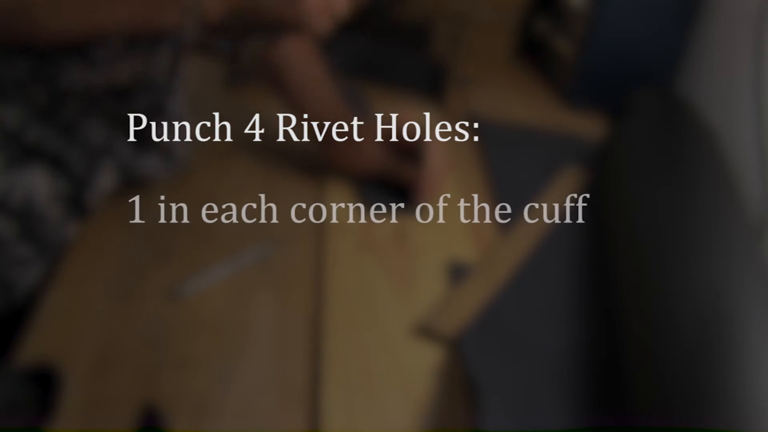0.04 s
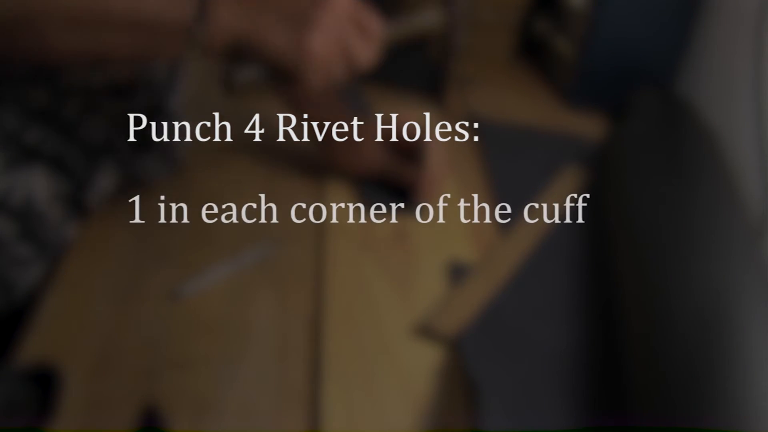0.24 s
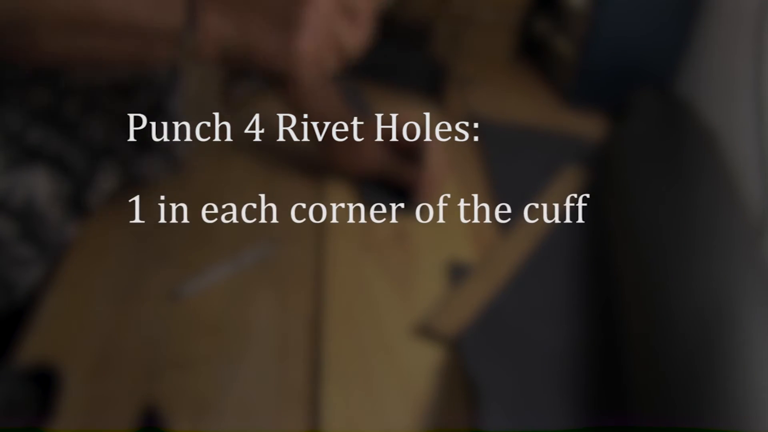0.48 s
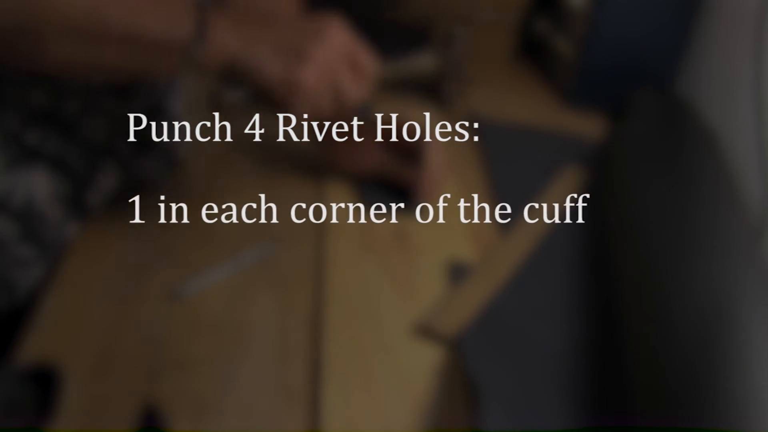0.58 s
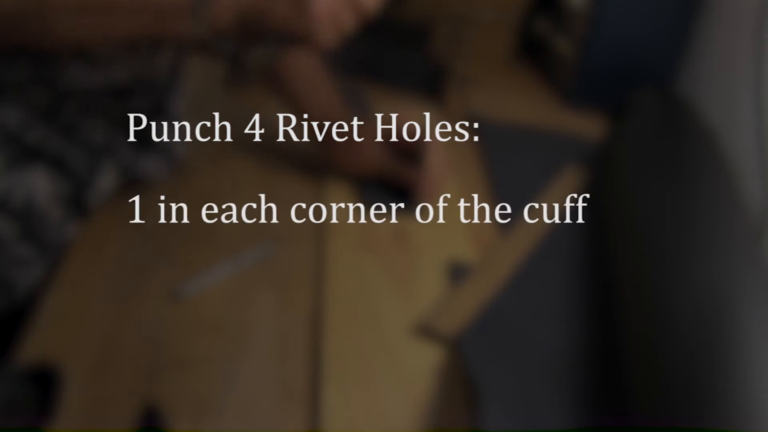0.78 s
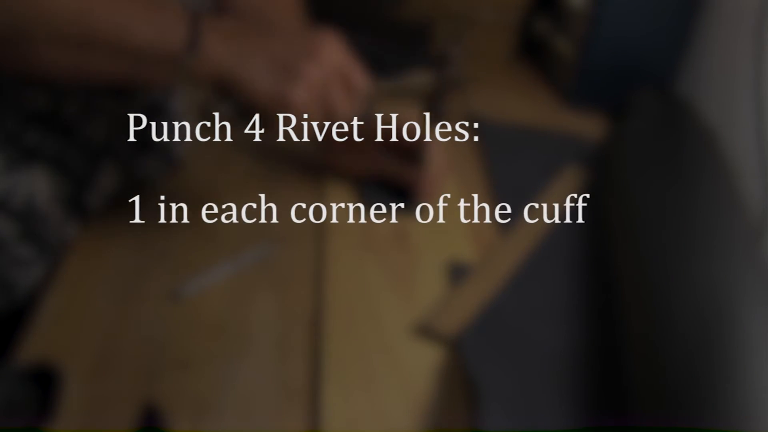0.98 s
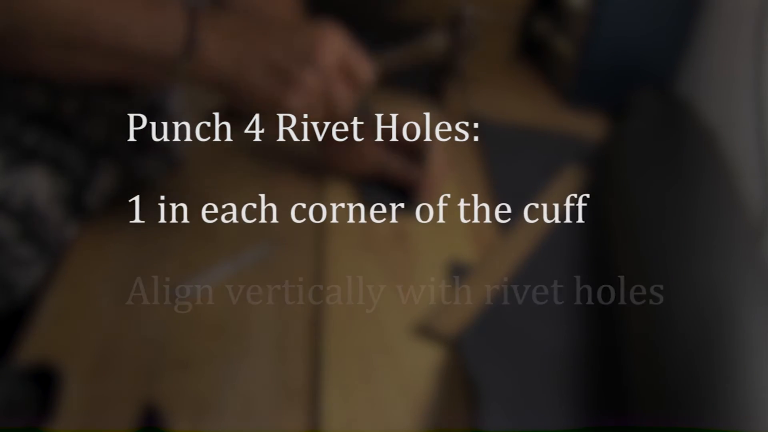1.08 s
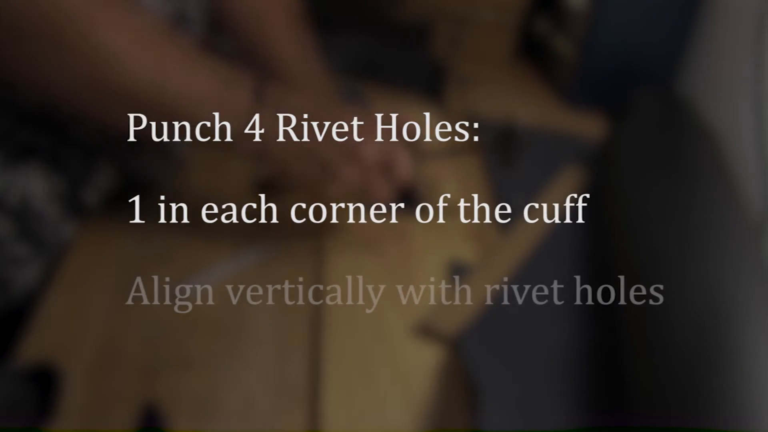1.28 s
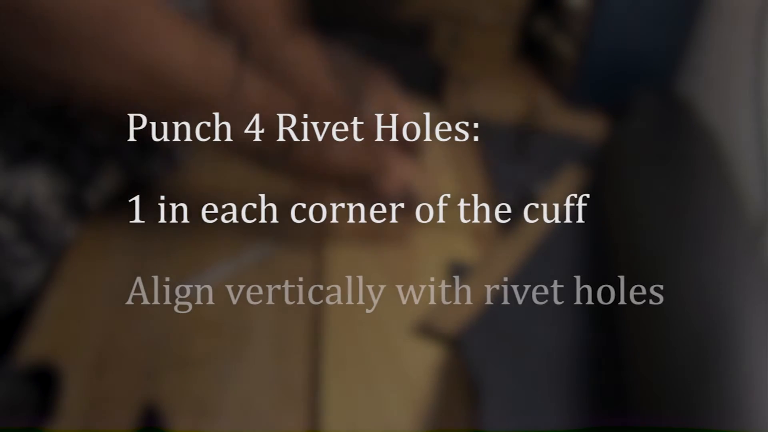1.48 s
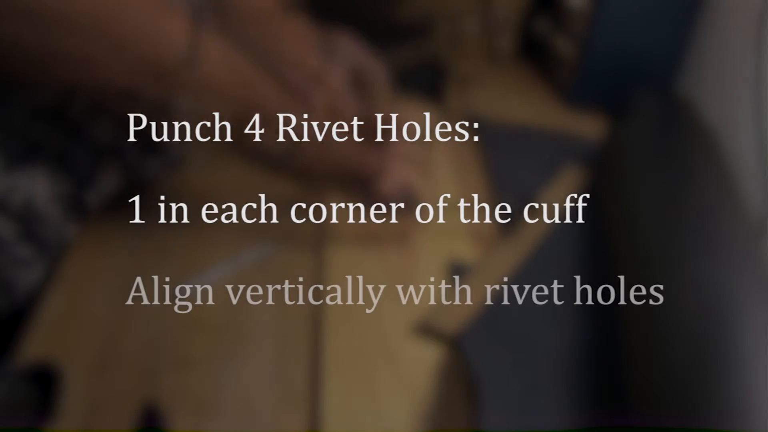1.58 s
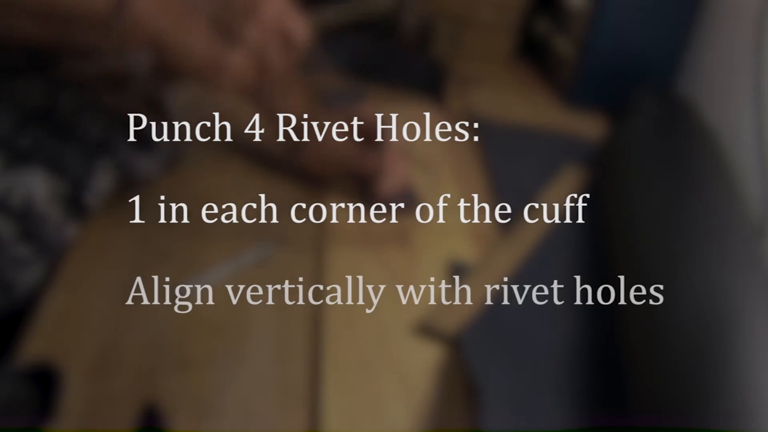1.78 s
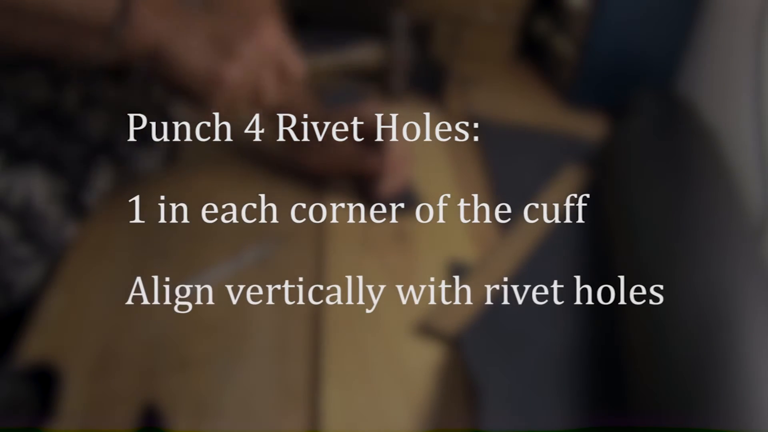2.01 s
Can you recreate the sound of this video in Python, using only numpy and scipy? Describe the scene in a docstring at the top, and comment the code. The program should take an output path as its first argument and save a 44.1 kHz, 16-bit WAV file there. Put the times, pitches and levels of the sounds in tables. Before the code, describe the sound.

Three hard, evenly spaced hammer blows on a metal punch crack and thump against wood, with room echo swelling after each; the ringing stops abruptly and soft woody bumps follow over low rumble and faint hiss.

```python
"""The fading ring of a hammer blow comes first, then light hammer chatter and three more blows in an echoey workshop.
A hammer drives a steel hole punch through leather into a board: decaying sines make the wood and steel ring,
shaped noise makes the crack and the room. The recorder's limiter ducks each blow and lets the room swell back.
Soft knocks of things shifted on the bench follow; between them the ringing is cut short and leather slides briefly.
Low rumble and faint hiss run throughout."""
import sys
import numpy as np
from scipy import signal
from scipy.fft import rfft, irfft
from scipy.io import wavfile
from scipy.ndimage import uniform_filter1d, minimum_filter1d

SR = 44100
rng = np.random.default_rng(int(sys.argv[2]) if len(sys.argv) > 2 else 0)


def file_out(sig):
    """Save sig as 16-bit WAV at sys.argv[1]."""
    # one column per channel
    cols = np.atleast_2d(sig).T
    # limit, then scale
    lim = np.clip(cols, -1, 1)
    pcm = np.round(lim * 32767).astype(np.int16)
    wavfile.write(sys.argv[1], SR, pcm)


N = 90404  # length in samples

LEAD_S = 0.25  # the track starts this early, so a blow before time zero can still ring
ALIKE_BELOW_HZ = 1500  # below this the room's echoes repeat from blow to blow


def amp(db):
    """Turns decibels into a gain."""
    return 10 ** (np.asarray(db) / 20)


def read(points, hz):
    """Reads a table of (pitch_hz, value) at any pitch, joining its points on a log-frequency axis."""
    pitch_hz, value = np.transpose(points)
    return np.interp(np.log(hz + 1), np.log(pitch_hz), value)


def add(mix, start_s, sound):
    """Adds a sound to a track that begins LEAD_S early, dropping what runs past the end."""
    start = max(round((start_s + LEAD_S) * SR), 0)
    part = mix[:, start:][:, :sound.shape[-1]]
    part += sound[..., :part.shape[1]]


def fade(t, t60_s):
    """Exponential decay that falls by 60 dB in t60_s."""
    return np.exp(-np.log(1000) * t / np.maximum(t60_s, 1e-3))


def noise(db_of, size, white=None, width=None):
    """Stereo noise with density db_of(hz), in dB per Hz; a quieter side signal gives it width."""
    # default stereo width: pitch_hz [Hz], side_over_mid_db [dB]
    usual_width = [(30, -26), (60, -41), (130, -56), (300, -51), (600, -25.5), (1400, -68), (3000, -43),
                   (5500, -21), (9000, -16), (14000, -13)]
    width = usual_width if width is None else width
    hz = np.fft.rfftfreq(size, 1 / SR)
    if white is None:
        white = rfft(rng.standard_normal((2, size)))
    mid, side = white * amp(db_of(hz)) * np.sqrt(SR / 2)
    side = side * amp(read(width, hz))
    return irfft([mid + side, mid - side], size)


def modes(table, t):
    """Natural vibrations of a struck body: decaying sines of alternating sign."""
    out = np.zeros(len(t))
    for k, (pitch_hz, level_db, t60_s) in enumerate(table):
        sine = np.sin(2 * np.pi * pitch_hz * t)
        out += (-1) ** k * amp(level_db) * fade(t, t60_s) * sine
    return out


def background():
    """Steady noise for room rumble and electronic hiss, plus a swell of noise for sliding leather."""
    # steady floor of rumble and hiss: pitch_hz [Hz], density_db [dB per Hz]
    floor_spectrum = [(20, -69), (35, -79), (57, -68), (95, -81.5), (150, -83.5), (220, -88), (285, -83),
                      (400, -90.5), (600, -92), (1200, -98), (2500, -99), (5500, -106), (9500, -110),
                      (13800, -117), (15000, -130)]
    # stereo width of the steady floor: pitch_hz [Hz], side_over_mid_db [dB]
    floor_width = [(60, -31), (130, -27), (290, -15), (640, -6.5), (1410, -15.5), (3100, -11.5),
                   (6820, -17), (15000, -7)]
    # leather rubbing on the board: pitch_hz [Hz], density_db [dB per Hz]
    slide_spectrum = [(300, -100), (1500, -100), (4500, -99), (11000, -106), (16000, -116)]
    hiss_hz, hiss_half_width_hz, hiss_db_per_hz = 7690, 475, -91.5
    slide_peak_s, slide_spread_s = 1.66, 0.048

    def hiss_db(hz):
        return hiss_db_per_hz - 10 * np.log10(1 + ((hz - hiss_hz) / hiss_half_width_hz) ** 4)

    t = np.arange(N) / SR
    floor = noise(lambda hz: read(floor_spectrum, hz), N, width=floor_width)
    hiss = noise(hiss_db, N, width=floor_width)
    swell = np.exp(-((t - slide_peak_s) / slide_spread_s) ** 2 / 2)
    slide = noise(lambda hz: read(slide_spectrum, hz), N) * swell
    return floor + hiss + slide


def knock(level_db, dull_above_hz, t60_s):
    """Work shifted on the bench: a soft, woody bump of fading noise with its treble rolled off."""
    # bump before the roll-off: pitch_hz [Hz], density_db [dB per Hz]
    knock_spectrum = [(60, -72), (200, -74), (420, -67), (650, -73), (950, -73.5), (1500, -81.5),
                      (3000, -83), (9000, -97)]
    rise_s = 0.00073

    def dulled_db(hz):
        return read(knock_spectrum, hz) - 10 * np.log10(1 + (hz / dull_above_hz) ** 6)

    t = np.arange(SR // 2) / SR
    body = noise(dulled_db, len(t))
    return amp(level_db) * body * (1 - np.exp(-t / rise_s)) * fade(t, t60_s)


def tick(level_db):
    """A light touch of the hammer on the punch: short modes and a puff of noise."""
    # small vibrations of the touch: pitch_hz [Hz], level_db [dB], t60_s [s]
    tick_modes = [(407, -36, 0.011), (710, -44, 0.031), (2580, -44, .05), (4230, -39, 0.027),
                  (4660, -44, 0.02), (8600, -46, 0.02), (13110, -60, .02)]
    # noise of the touch: pitch_hz [Hz], density_db [dB per Hz]
    tick_spectrum = [(200, -71), (1500, -90), (5000, -80), (14000, -100)]
    noise_t60_s = 0.031
    t = np.arange(SR // 4) / SR
    puff = noise(lambda hz: read(tick_spectrum, hz), len(t)) * fade(t, noise_t60_s)
    return amp(level_db) * (modes(tick_modes, t) + puff)


def room(colour, t, paths):
    """The workshop's answer: echo noise fading at each pitch's own rate, booming modes and a faint long ring."""
    # reverberation before the blow's colour: pitch_hz [Hz], density_db [dB per Hz]
    tail_spectrum = [(25, -64), (60, -40.5), (125, -36.5), (200, -40.5), (250, -38.5), (330, -35),
                     (450, -35), (700, -37), (1000, -38.5), (1700, -41), (2600, -41.5), (3400, -46),
                     (4400, -45), (7200, -45.5), (9000, -51), (10800, -51.5), (12500, -60), (16000, -72)]
    # how long the reverberation lasts: pitch_hz [Hz], t60_s [s]
    tail_t60 = [(50, 1), (130, 0.41), (300, 0.42), (1000, 0.35), (3000, 0.35), (7000, .39), (15000, 0.34)]
    # long low modes of the room: pitch_hz [Hz], level_db [dB], t60_s [s]
    boom_modes = [(58.2, -37, 1.5), (112.64, -19.5, 1.074), (150.4, -22.5, 1.05), (172, -20.5, 0.92),
                  (226, -33, 1.2), (277, -28.5, 0.91), (394, -23.5, 0.58)]
    # lingering ring of things around the bench: pitch_hz [Hz], density_db [dB per Hz]
    linger_spectrum = [(40, -55.5), (120, -47), (400, -66), (900, -74), (2000, -78), (3500, -93),
                       (8000, -105)]
    linger_t60_s, rise_s = 1.91, 0.0027
    colour_share = 0.74  # part of the blow's colour, in dB, that reaches the echoes

    # the same low echoes every time, fresh ones above
    low = np.fft.rfftfreq(len(t), 1 / SR) < ALIKE_BELOW_HZ
    white = np.where(low, paths, rfft(rng.standard_normal((2, len(t)))))
    steady = noise(lambda hz: read(tail_spectrum, hz) + colour_share * colour(hz), len(t), white)

    # fade each pitch at its own rate
    pitch_hz, when_s, grains = signal.stft(steady, SR, nperseg=512)
    faded = grains * fade(when_s, read(tail_t60, pitch_hz)[:, None])
    tail = signal.istft(faded, SR)[1][:, :len(t)]
    linger = noise(lambda hz: read(linger_spectrum, hz), len(t)) * fade(t, linger_t60_s)
    return (tail + linger + modes(boom_modes, t)) * (1 - np.exp(-t / rise_s))


def steel_colour(bands):
    """Each blow lands differently: stressed or missing bands and a fine random ripple of steel resonances."""
    ripple_db, ripple_step_hz = 1.6, 130
    grid_hz = np.arange(200) * ripple_step_hz
    ripple = ripple_db * rng.standard_normal(len(grid_hz)) * (grid_hz > ALIKE_BELOW_HZ)

    def colour(hz):
        total_db = np.interp(hz, grid_hz, ripple)
        for centre_hz, width_hz, level_db in bands:
            total_db = total_db + level_db * np.exp(-((hz - centre_hz) / width_hz) ** 2)
        return total_db

    return colour


def punch_ring(levels_db, t):
    """The steel punch's two high modes, brief themselves but held on by narrow bands of room echo."""
    # ring of the punch before each blow's levels: pitch_hz [Hz], level_db [dB], t60_s [s]
    punch_modes = [(11010, -1.5, 0.043), (11580, -7, 0.032)]
    echo_db, echo_t60_s, echo_width_hz = -14, 0.34, 160
    out = np.zeros((2, len(t)))
    for (pitch_hz, mode_db, t60_s), level_db in zip(punch_modes, levels_db):
        band = noise(lambda hz: -10 * np.log10(1 + (2 * (hz - pitch_hz) / echo_width_hz) ** 4), len(t))
        echo = amp(echo_db) * band / band.std() * fade(t, echo_t60_s)
        direct = modes([(pitch_hz, mode_db, t60_s)], t)
        out += amp(level_db) * (direct + echo)
    return out


def blow(t, paths, force_db, crack_db, seat_db, lower_ring_db, upper_ring_db, bands):
    """One hammer blow: the board thumps, the steel cracks and rings a moment later, the room answers."""
    # modes of the board and bench: pitch_hz [Hz], level_db [dB], t60_s [s]
    board_modes = [(103.3, -13.5, 0.32), (136.3, -3.5, 0.16), (200.2, -0.5, 0.12), (288.9, -0.5, 0.19),
                   (322.6, -4, .15), (358.2, -2.5, 0.17), (398.4, 1.5, 0.21), (429.4, -4.5, 0.23),
                   (498, -10, 0.23), (729.3, -6.5, .16), (890, -16, 0.32), (1057.5, -4.5, 0.095),
                   (1157, -5, 0.09), (1359, -5.5, .11), (2127, -14, 0.16), (2766, -17.5, 0.11)]
    # mode of the punch once seated in the wood: pitch_hz [Hz], level_db [dB], t60_s [s]
    seat_modes = [(603, -2, 0.23)]
    # crack of steel on steel before the blow's colour: pitch_hz [Hz], density_db [dB per Hz]
    crack_spectrum = [(60, -72), (400, -17.5), (1000, -23), (1750, -37), (2800, -27.5), (3500, -37),
                      (4800, -29.5), (7000, -35), (8800, -41.5), (10500, -34), (12500, -47.5), (16000, -38)]
    steel_lag_s, steel_rise_s, crack_t60_s = 0.00092, 0.00061, 0.031

    colour = steel_colour(bands)
    crack = noise(lambda hz: read(crack_spectrum, hz) + colour(hz), len(t))
    crack = amp(crack_db) * crack * fade(t, crack_t60_s)
    onset = np.clip((t - steel_lag_s) / steel_rise_s, 0, 1) ** 2
    steel = (crack + punch_ring((lower_ring_db, upper_ring_db), t)) * onset
    wood = modes(board_modes, t) + amp(seat_db) * modes(seat_modes, t)
    return amp(force_db) * (steel + wood + room(colour, t, paths))


def scene():
    """Lays out blows, chatter and knocks over the background; ringing stops at the cut."""
    # hammer blows: start_s [s], force_db, crack_db, seat_db, lower_ring_db, upper_ring_db [all dB],
    # bands (list of centre_hz [Hz], width_hz [Hz], level_db [dB])
    blows = [(-.19, -9.5, -8, -4, -16, -20, [(4020, 1430, 15.5), (6700, 660, 2), (9100, 1500, 10.5),
             (12800, 1000, 18)]), (0.2443, -2.5, -0.5, -17, -15, -9, [(3280, 500, -5), (6050, 350, 10),
             (7400, 600, 3), (10230, 350, 6.5), (13200, 500, 10)]),
             (0.6264, -1, 0, -2.5, -5.5, -3.5, [(2953, 145, 6.5), (4280, 260, 6.5), (7020, 850, 5),
             (9100, 930, 0), (10540, 500, 7)]), (1.0014, -1, 0, -2, 1.5, -18, [(4800, 1100, 3.5),
             (5740, 280, -5.5), (8600, 400, 8.5), (9800, 600, -1.5)])]
    # hammer head bouncing lightly on the punch: start_s [s], level_db [dB]
    chatter = [(0.1705, -15), (0.1779, -3.5), (0.1849, -5), (0.1919, -4.5)]
    # work shifted on the bench: start_s [s], level_db [dB], dull_above_hz [Hz], t60_s [s]
    knocks = [(1.498, 3, 650, .09), (1.55, 0.5, 2800, 0.09), (1.558, 1.5, 2860, 0.13),
              (1.687, -0.5, 610, 0.16)]
    cut_s, cut_fade_s = 1.594, 0.003

    lead = round(LEAD_S * SR)
    before, after = np.zeros((2, 2, N + lead))
    t = np.arange(int(1.5 * SR)) / SR
    paths = rfft(rng.standard_normal((2, len(t))))  # echo pattern shared by all blows
    for start_s, *settings in blows:
        add(before, start_s, blow(t, paths, *settings))
    for start_s, level_db in chatter:
        add(before, start_s, tick(level_db))
    for start_s, *settings in knocks:
        track = before if start_s < cut_s else after
        add(track, start_s, knock(*settings))
    kept = np.clip((cut_s - np.arange(N) / SR) / cut_fade_s, 0, 1)
    return before[:, lead:] * kept + after[:, lead:] + background()


def record(dry):
    """The recorder: a fast limiter that holds then recovers, a low cut, soft overload and a treble limit."""
    limit_db, hold_s, attack_s, recover_db_per_s = -10, 0.026, 0.00059, 128
    low_cut_hz, ceiling, top_hz = 52.5, 0.51, 16000

    # how far the power, averaged over about 4 ms, exceeds the limit
    power = uniform_filter1d((dry ** 2).mean(0), size=176)
    over_db = np.maximum(10 * np.log10(abs(power) + 1e-12) - limit_db, 0)

    # hold the largest recent excess, then let it fall steadily
    hold = max(int(hold_s * SR), 2)
    held_db = -minimum_filter1d(-over_db, hold, origin=(hold - 1) // 2)
    fall_db = np.arange(N) / SR * recover_db_per_s
    target_db = np.maximum.accumulate(held_db + fall_db) - fall_db

    # the gain follows that target with a short lag
    r = np.exp(-1 / (attack_s * SR))
    cut_db = signal.lfilter([1 - r], [1, -r], target_db)
    low_cut = signal.butter(2, low_cut_hz, "high", fs=SR, output="sos")
    ducked = signal.sosfilt(low_cut, dry * amp(-cut_db))

    clipped = ducked / (1 + (ducked / ceiling) ** 6) ** (1 / 6)  # peaks bend towards the ceiling
    treble_limit = signal.firwin(255, top_hz, window=("kaiser", 9), fs=SR)
    return signal.oaconvolve(clipped, treble_limit[None], "same")


dry = scene()
out = record(dry)
file_out(out)
```